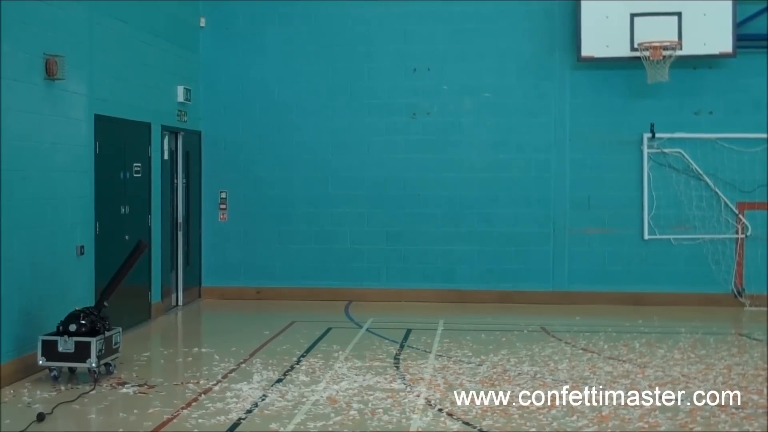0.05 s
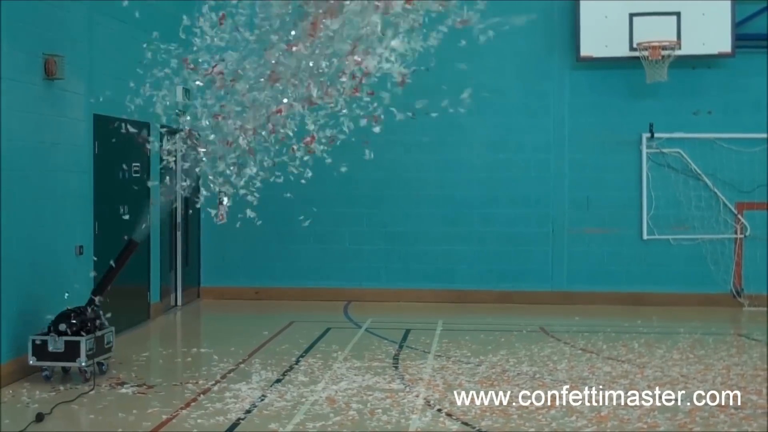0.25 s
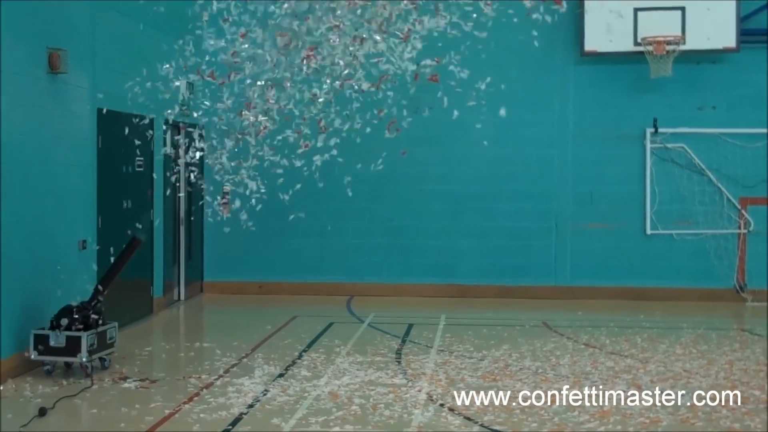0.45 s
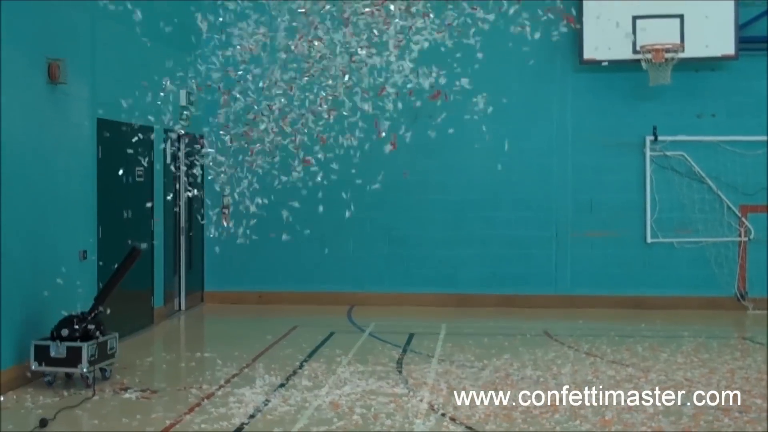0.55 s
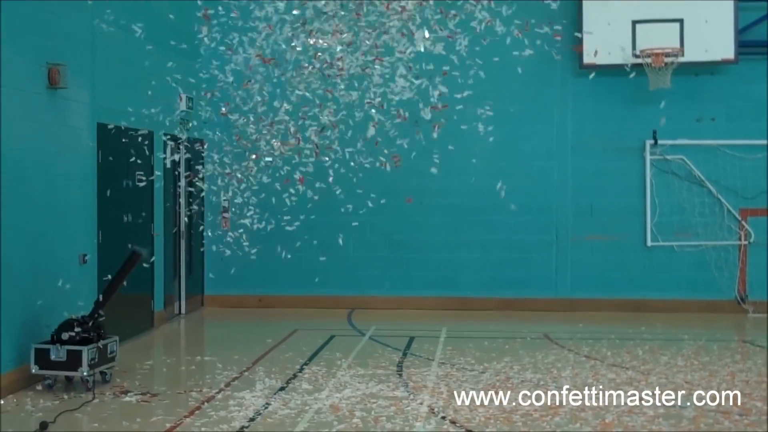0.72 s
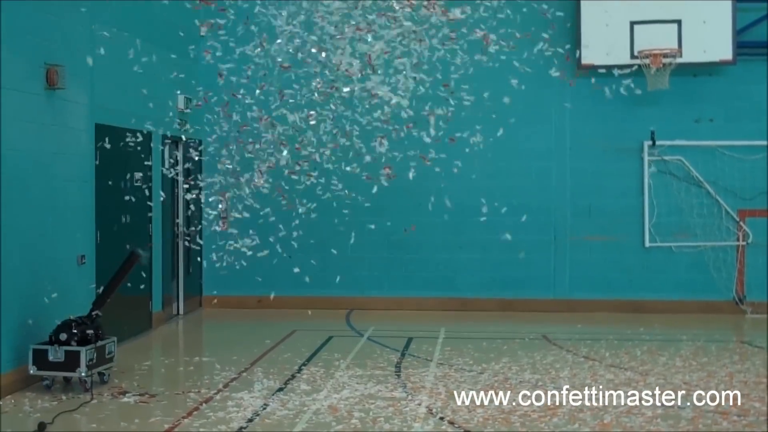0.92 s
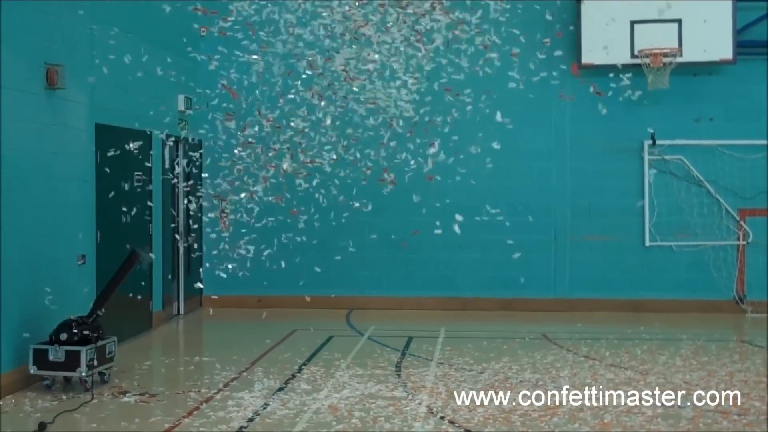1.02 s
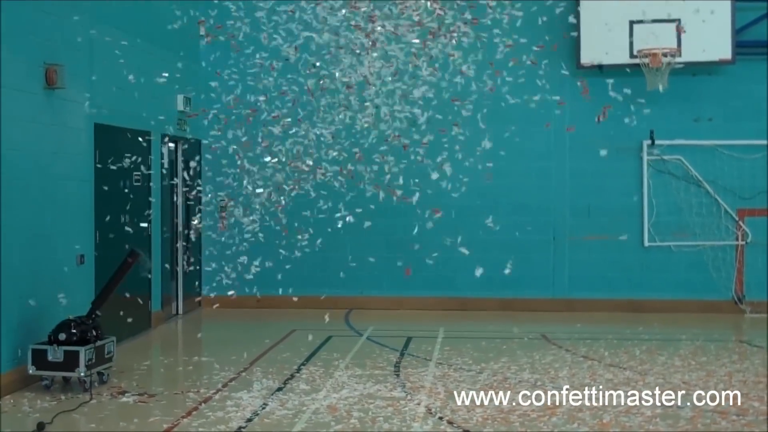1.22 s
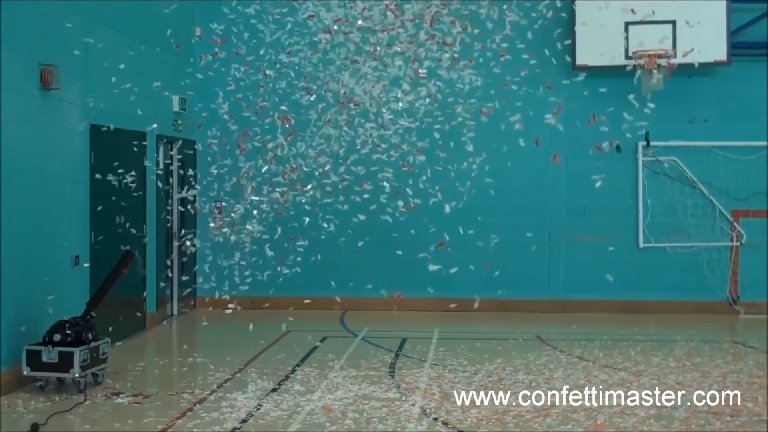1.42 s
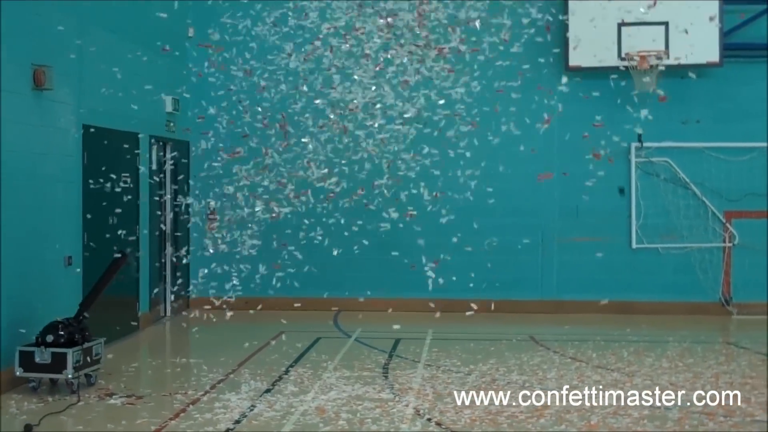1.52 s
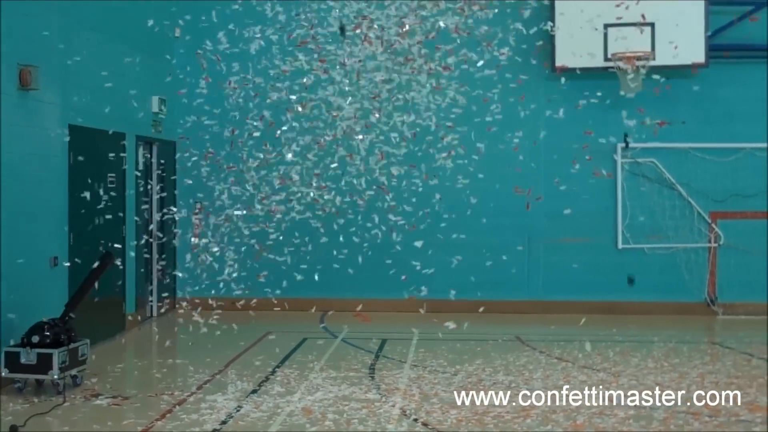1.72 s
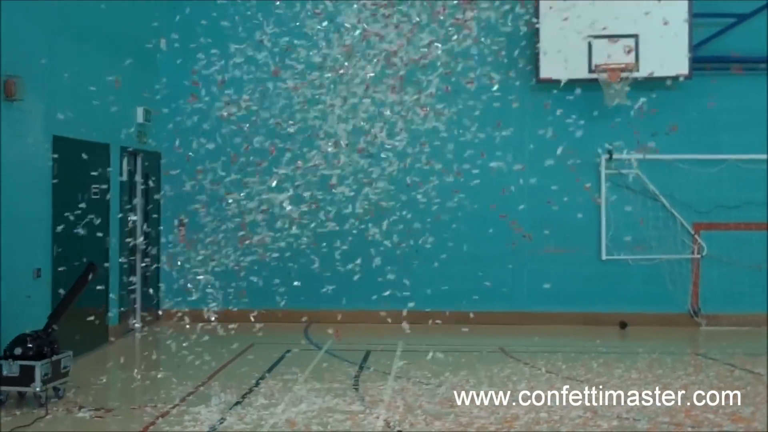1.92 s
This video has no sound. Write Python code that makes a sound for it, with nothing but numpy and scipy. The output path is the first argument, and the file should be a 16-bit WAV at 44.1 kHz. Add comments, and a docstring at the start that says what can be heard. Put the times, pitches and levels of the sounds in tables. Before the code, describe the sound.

A compressed-air confetti cannon fires once with a loud pop and a rush of air, briefly overloading the microphone. The large sports hall rings with a long echo, and a few small knocks follow over a faint hum.

```python
"""A compressed-air confetti cannon fires once in a large sports hall.
The valve ticks, air hisses up the barrel, the charge pops out and the barrel hoots as it empties.
The pop bounces off the floor and walls, and the hall rings on. A few small knocks follow over a faint
room hum. The blast overloads the microphone and turns its gain down; the gain then creeps back."""
import sys
import numpy as np
from scipy import signal
from scipy.fft import rfft, irfft
from scipy.io import wavfile
from scipy.ndimage import uniform_filter1d

SR = 44100
rng = np.random.default_rng(int(sys.argv[2]) if len(sys.argv) > 2 else 0)


def transcribe(signal):
    """Save signal, clipped to [-1, 1], as a 16-bit WAV file at the path in sys.argv[1]."""
    frames = np.atleast_2d(signal).T
    limited = np.clip(frames, -1, 1)
    pcm = np.round(limited * 32767).astype(np.int16)
    wavfile.write(sys.argv[1], SR, pcm)


N = 85995
T = np.arange(N) / SR
POP_S = 0.24635  # the moment the charge leaves the barrel


def amp(db):
    """Turns decibels into a factor to multiply by."""
    return 10 ** (np.asarray(db) / 20)


def evened(x):
    """Scales a signal to an average power of 1."""
    return x / np.sqrt(np.mean(x ** 2) + 1e-20)


def read(points, hz, column=1):
    """Looks up a table at any pitch, blending between its rows."""
    table = np.transpose(points)
    return np.interp(np.log(hz + 1), np.log(table[0] + 1), table[column])


def since(s):
    """Seconds after a moment, zero before it."""
    return np.maximum(T - s, 0)


def dying(s, fade_s):
    """Starts suddenly, then falls by 60 dB in each fade time."""
    return (T >= s) * np.exp(-np.log(1000) * since(s) / fade_s)


def tint(x, colour, peaks=()):
    """Makes some pitches louder and others softer, with narrow peaks if given."""
    f = np.fft.rfftfreq(N, 1 / SR)
    boost_db = sum(db / (1 + (2 * (f - hz) / width) ** 2) for hz, width, db in peaks)
    return irfft(rfft(x) * amp(read(colour, f) + boost_db), N)


def noise(colour, peaks=()):
    """Tinted noise with an average power of 1."""
    return evened(tint(rng.standard_normal(N), colour, peaks))


def wander(seconds):
    """A smooth random drift."""
    size = max(int(seconds * SR), 2)
    return evened(uniform_filter1d(uniform_filter1d(rng.standard_normal(N), size), size))


def gust(s, rise_s, hold_s, fall_db_per_s):
    """The strength of a rush of air: it builds, holds and dies away."""
    opening = np.minimum(since(s) / rise_s, 1) ** 0.7
    return opening * amp(-fall_db_per_s * since(s + rise_s + hold_s))


def swing(s, hz, rise_s):
    """Air pressure swings to and fro, swelling and then dying."""
    age = since(s) / rise_s
    return -age * np.exp(1 - age) * np.sin(2 * np.pi * hz * since(s))


def room_tone():
    """The faint, steady noise of the hall."""
    # tone colour of the room: f/Hz, level/dB
    colour = [(25, -9), (60, -7), (120, -3.5), (300, -0.5), (600, -3), (950, 2.5), (1500, -6.5),
              (3000, -9.5), (5000, -21.5), (9000, -24), (14000, -36)]
    return amp(-55) * noise(colour)


def knocks():
    """Small hard things click and thud."""
    # each knock: t/s, click level/dB, thud level/dB
    hits = [(1.5228, -44.5, -56), (1.9272, -45, -35), (1.9368, -39.5, -27)]
    # tones of the knocked thing: f/Hz, level/dB, fade time/s
    tones = [(646, -3, 0.14), (800, -2, 0.065), (1060, -8, .12), (1285, 7, 0.013), (2020, -13, .08)]
    # tone colour of the click: f/Hz, level/dB
    colour = [(200, -12), (2000, 11), (4400, 6.5), (6500, -8), (8500, -3), (14000, -25)]
    click = noise(colour)
    sound = np.zeros(N)
    for s, click_db, thud_db in hits:
        thud = sum(amp(db) * dying(s, fade) * np.sin(2 * np.pi * hz * since(s)) for hz, db, fade in tones)
        soft_start = np.minimum(since(s) / 0.0012, 1)
        sound += amp(click_db) * click * dying(s, fade_s=0.03) + amp(thud_db) * soft_start * thud
    return sound


def hall_ring():
    """A few wavering tones ring on in the hall after the pop."""
    # ringing tones: f/Hz, level/dB, fade time/s, phase waver/rad
    tones = [(246.4, -33, 7.6, 1.3), (339.4, -25.5, 4.6, 1.8), (440, -28, 4.7, 2), (606, -34.5, 2.3, 0.87),
             (765, -30, 5, 0.86), (914, -27, 4, 1.1), (1084, -29.5, 5, .6), (1202, -30.5, 6.7, .5),
             (1292, -34, 4.2, .8)]
    return sum(amp(db) * dying(POP_S, fade) * np.sin(2 * np.pi * hz * T + waver * wander(seconds=0.06))
               for hz, db, fade, waver in tones)


def hall_tail():
    """How the hall answers a click: quick scatter and a long echo whose treble dies first."""
    # long echo: f/Hz, level/dB, fade time/s
    far_bands = [(30, -20, 1.4), (74.4, -28, 0.61), (96, -5.5, 1.6), (119, -2.5, 4.2), (185, -11, 1.5),
                 (229, 3, 3.2), (320, -3.5, 3.3), (500, -3.5, 4.5), (738, -2, 3.73), (1030, -8, 4.25),
                 (1997, -6, 3.41), (3200, -7, 2.635), (4970, -9.5, 1.4), (7930, -10.5, 0.76),
                 (13000, -18, .55)]
    # scatter from the nearest walls: f/Hz, level/dB
    near_colour = [(40, -24.5), (70, -11), (150, -2.5), (400, 8), (1500, -5.5), (4000, 1.5), (12000, -9)]

    def decay(t, fade_s):
        """A fade with the same total energy however long it lasts."""
        return np.exp(-np.log(1000) * t / fade_s) * np.sqrt(2 * np.log(1000) / (fade_s * SR))

    hz, t, bands = signal.stft(tint(rng.standard_normal(N), far_bands), SR, nperseg=1024, noverlap=768)
    bands *= decay(t, read(far_bands, hz, column=2)[:, None])
    far = signal.istft(bands, SR, nperseg=1024, noverlap=768)[1][:N]
    far *= amp(4 * np.exp(-((T - 0.23) / 0.047) ** 2))  # the far wall swells the echo after 0.23 s
    near = amp(-3) * tint(rng.standard_normal(N), near_colour) * decay(T, fade_s=0.55)
    delay_s, build_s = 0.011, 0.01
    return (far + near) * np.minimum(since(delay_s) / build_s, 1)


def hall_echo(common, directions=4):
    """Each direction gets the common sound, its own swirl of rushing air and its own echo."""
    echoes = sum(signal.fftconvolve(common + air_blast(), hall_tail())[:N] for _ in range(directions))
    return echoes / np.sqrt(directions)


def pop_echoes():
    """The pop bounces back from the floor and walls."""
    # each bounce: t/s, level against the pop/dB
    bounces = [(.2574, -4), (.2622, -9.5), (.2790, -16), (0.279, -19), (.2815, -1.5), (.3400, -10),
               (.3905, -29), (.4475, -13.5), (0.9755, -24), (1.402, -33.5)]
    return sum(amp(db) * pop(s) for s, db in bounces)


def valve():
    """Two ticks as the valve trips before the shot."""
    # each tick: t/s, level/dB, fade time/s
    ticks = [(0.2012, -45.5, 0.027), (0.2195, -40.5, 0.035)]
    # tone colour of the ticks: f/Hz, level/dB
    colour = [(200, -10.5), (1500, -9), (4000, 5), (6000, -2.5), (9000, -3), (14000, -17)]
    return noise(colour) * sum(amp(db) * dying(s, fade) for s, db, fade in ticks)


def barrel():
    """A low push of air and the hoot of the emptying tube."""
    # low swells: t/s, f/Hz, rise time/s, level/dB
    swells = [(.236, 62, .022, -17.5), (.228, 90, .014, -23.5), (.299, 157, 0.0087, -15.5),
              (.335, 105, 0.0089, -18), (.329, 310, 0.015, -14)]
    return sum(amp(db) * swing(s, hz, rise) for s, hz, rise, db in swells)


def air_blast():
    """Air hisses past the charge, then roars from the open barrel and fades as the tank empties."""
    # tone colour of the hiss: f/Hz, level/dB
    hiss_colour = [(25, -7.5), (70, -9), (150, -6.5), (300, 11), (900, 2), (2000, 1), (4500, -3.5),
                   (8000, -4), (11000, -4), (14000, -16)]
    # tone colour of the roar: f/Hz, level/dB
    roar_colour = [(30, -9.5), (130, -4), (300, 1), (500, 0.5), (750, 2.5), (1100, 3), (1500, 1),
                   (2600, -5.5), (4200, -8.5), (8000, -8.5), (14000, -20)]
    # pitches at which the barrel rings: f/Hz, width/Hz, boost/dB
    peaks = [(1060, 60, 3.5), (2140, 70, 4), (2700, 200, 4), (3075, 35, 8)]
    hiss = noise(hiss_colour, peaks) * gust(0.2243, rise_s=0.011, hold_s=0.066, fall_db_per_s=142)
    roar = noise(roar_colour, peaks) * gust(POP_S, rise_s=0.0015, hold_s=0.032, fall_db_per_s=218)
    return amp(-15) * hiss + amp(-0.5) * roar


def pop(s):
    """The charge bursts out: one strong pressure swing that dies almost at once."""
    return amp(12) * swing(s, hz=760, rise_s=0.0006)


def scene():
    """The shot, its echoes, the knocks and the quiet hall, in one channel."""
    cannon = valve() + barrel()
    bang = pop(POP_S)
    tail = hall_echo(cannon + amp(-13) * bang) + hall_ring()  # only part of the pop feeds the hall
    return (cannon + air_blast() + bang + pop_echoes() + tail + knocks() + room_tone())[None]


def record(dry):
    """The microphone turns down for the blast, recovers slowly, squashes peaks and cuts the top treble."""
    limit_db, recover_db_per_s, window_s, hardness, top_hz = -10.5, 5.5, 0.011, 5, 13950
    memory = np.exp(-1 / (window_s * SR))
    power_db = 10 * np.log10(signal.lfilter([1 - memory], [1, -memory], dry[0] ** 2) + 1e-12)
    creep_db = recover_db_per_s * T
    held_db = np.maximum.accumulate(power_db + creep_db) - creep_db  # jumps up at once, sinks slowly
    turned_down = dry * amp(-np.maximum(held_db - limit_db, 0))
    squashed = turned_down / (1 + abs(turned_down) ** hardness) ** (1 / hardness)
    treble_cut = signal.firwin(511, top_hz, window=("kaiser", 9), fs=SR)
    return signal.oaconvolve(squashed, treble_cut[None], "same")


dry = scene()
out = record(dry)
transcribe(out)
```